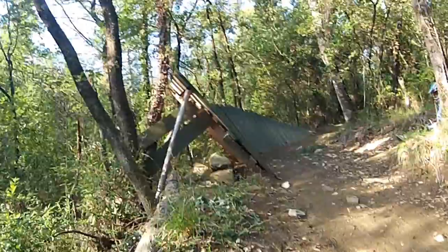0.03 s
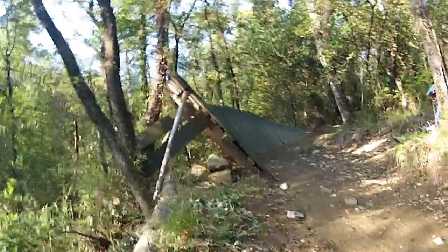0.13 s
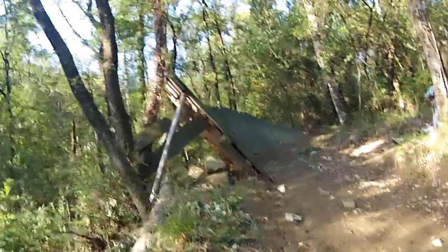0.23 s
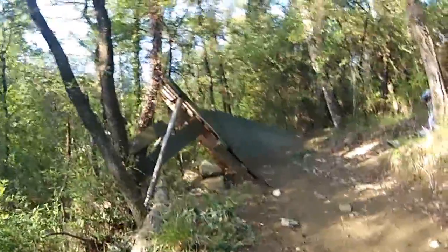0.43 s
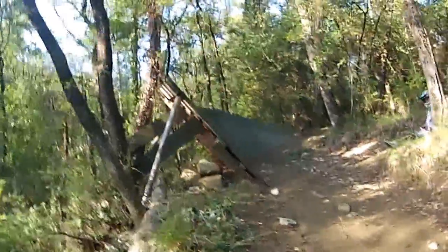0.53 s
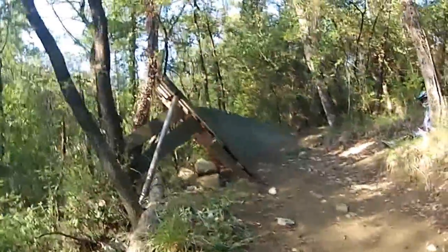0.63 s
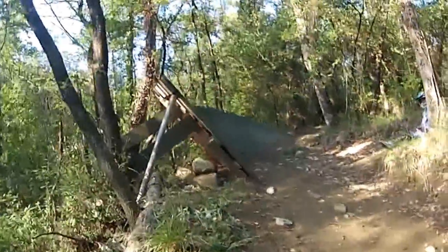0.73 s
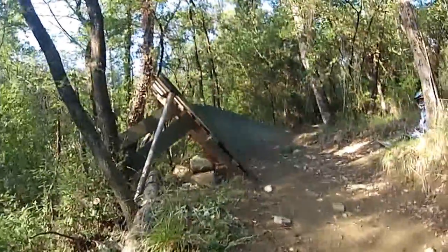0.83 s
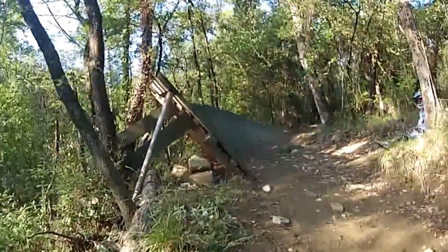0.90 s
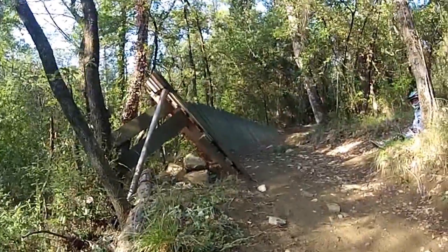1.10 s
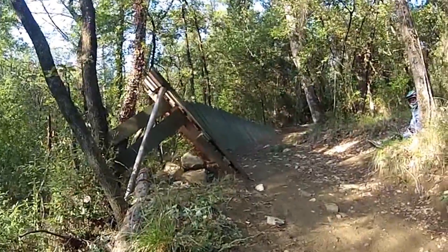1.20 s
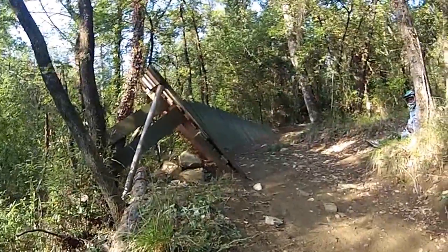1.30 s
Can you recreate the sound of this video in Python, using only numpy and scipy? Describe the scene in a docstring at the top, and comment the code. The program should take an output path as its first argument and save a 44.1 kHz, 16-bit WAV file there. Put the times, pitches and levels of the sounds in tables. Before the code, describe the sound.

A finger rubs across a camera's microphone in three quick strokes, with low bumps, ticks and a brief ringing scrape on the hardest. A few small clicks and soft knocks follow on a quiet woodland trail.

```python
"""Handling noise at a hand-held camera's own microphone, beside a quiet woodland trail.
Faint outdoor air opens abruptly, and at once a finger rubs over the case in three strokes: tiny slips
rasp through the shell while the grip rumbles and bumps and the case ticks a few times.
Half a second in, in the hardest stroke, the skin catches and rings what is likely the microphone port.
After 1.1 s the finger rests; a few dry clicks and soft knocks follow, then only air and a low rumble."""
import sys
import numpy as np
from scipy import signal
from scipy.fft import rfft, irfft
from scipy.io import wavfile
from scipy.ndimage import uniform_filter1d

SR = 44100
rng = np.random.default_rng(int(sys.argv[2]) if len(sys.argv) > 2 else 0)


def dump(signal):
    """Clip the signal to [-1, 1] and save it as 16-bit WAV at the path in sys.argv[1]."""
    limited = np.clip(np.atleast_2d(signal).T, -1, 1)
    pcm = np.round(limited * 32767).astype(np.int16)
    wavfile.write(sys.argv[1], SR, pcm)


N = 59535
T = np.arange(N) / SR


def undb(db):
    """Decibels to gain."""
    return 10 ** (np.asarray(db) / 20)


def unit(x):
    """Scale to rms 1."""
    return x / np.sqrt(np.mean(x ** 2) + 1e-20)


def peak(x, db):
    """Scale to a peak level."""
    return x * undb(db) / (np.abs(x).max() + 1e-12)


def curve(rows):
    """Gain over time through (time [s], level [dB]) points."""
    return undb(np.interp(T, *np.array(rows).T))


def colour(x, points):
    """Minimum-phase filter through (frequency [Hz], gain [dB]) points."""
    hz, db = np.array(points, float).T
    size = 4096
    bins_hz = np.maximum(np.arange(size // 2 + 1) * SR / size, 1)
    gain = undb(np.interp(np.log(bins_hz), np.log(hz), db))
    cepstrum = irfft(np.log(gain))
    cepstrum[1:size // 2] *= 2
    cepstrum[size // 2 + 1:] = 0
    return signal.fftconvolve(x, irfft(np.exp(rfft(cepstrum))))[:N]


def shelf(x, hz, rows):
    """Raise or lower everything above hz along (time [s], gain [dB]) points."""
    highs = signal.sosfiltfilt(signal.butter(2, hz, "high", fs=SR, output="sos"), x)
    return x + (curve(rows) - 1) * highs


def ring(x, hz, width):
    """One resonance, gain 1 at its centre."""
    return signal.lfilter(*signal.iirpeak(hz, hz / width, fs=SR), x)


def resonate(x, modes):
    """A set of resonances, each with its flanks steepened by a second, wider one."""
    return sum(undb(db) * ring(ring(x, hz, width), hz, 5.5 * width) for hz, width, db in modes)


def wander(per_s):
    """Smooth random motion with rms 1."""
    hold = int(SR / per_s)
    steps = np.repeat(rng.standard_normal(N)[:N // hold + 1], hold)
    return unit(uniform_filter1d(steps, hold)[:N])


def steady(x, span_s):
    """Even out slow swells of a random signal, keeping its grain."""
    power = uniform_filter1d(x ** 2, max(int(span_s * SR), 2))
    return x / np.sqrt(np.abs(power) + 1e-12)


def burst(start, decay_s):
    """Noise of a short contact that crumbles away."""
    return rng.standard_normal(N) * (T >= start) * np.exp(-np.maximum(T - start, 0) / decay_s)


def tap(start, again_s, again_db):
    """A sharp impulse and a weaker one just after it."""
    return np.diff((T >= start) + undb(again_db) * (T >= start + again_s), prepend=0)


# Spectrum of the open air beside the trail (frequency [Hz], gain [dB])
AIR_COLOUR = [(30, -10), (200, -6.5), (400, -9), (900, -16.5), (2400, -21), (5200, -29), (6000, -40),
              (6800, -30.5), (12000, -35.5), (15000, -39)]

def air(level_db=-63.5):
    """Faint, steady outdoor background all around the microphone."""
    return undb(level_db) * unit(colour(rng.standard_normal(N), AIR_COLOUR))


def slips(per_s=1500, scatter_db=1.5, hiss_db=0.5):
    """Skin sliding on the case: dense tiny slips of uneven size over a smooth hiss."""
    hits = rng.random(N) < per_s / SR
    sizes = np.sign(rng.standard_normal(N)) * undb(scatter_db * rng.standard_normal(N))
    hiss = undb(hiss_db) * rng.standard_normal(N)
    return steady(unit(hits * sizes) + hiss, span_s=0.014)


# Strokes of the finger on the case (time [s], level [dB])
STROKES = [(0.12, -48.5), (0.165, -44.5), (0.252, -40.5), (0.274, -54), (0.325, -47), (0.389, -46.5),
           (0.400, -38), (0.445, -33.5), (0.475, -33.5), (0.53, -31.5), (0.605, -34.5), (0.628, -40.5),
           (0.695, -43.5), (0.718, -57.5), (0.738, -50.5), (0.762, -43), (0.835, -40), (0.87, -43),
           (0.912, -43), (0.962, -48.5), (1.02, -48), (1.052, -43.5), (1.075, -55.5), (1.108, -49.5),
           (1.122, -76), (1.35, -107)]
# The shell as the microphone inside hears it (frequency [Hz], gain [dB])
SHELL_COLOUR = [(100, 2), (300, -8), (480, -15.5), (720, -14), (980, -2), (1180, -6.5), (1550, -3),
                (1850, 2), (2100, 1.5), (2480, -0.5), (2900, -8.5), (3250, -4.5), (3750, -6.5),
                (4050, -13.5), (5200, -15), (6000, -31), (6800, -17.5), (7900, -19), (8350, -13.5),
                (9200, -15), (9550, -11.5), (10200, -13), (11600, -39), (12700, -42), (13900, -12.5),
                (15400, -23.5)]
# Treble of the rubbing (time [s], gain [dB])
RUB_TREBLE = [(0.15, 5.5), (0.257, 7.5), (0.28, -0.5), (0.305, 7), (0.40, -3), (0.50, 1.5), (0.66, 2),
              (0.83, -0.5), (1.05, -3.5)]
# Top octave of the rubbing (time [s], gain [dB])
RUB_SHEEN = [(0.25, -4.5), (0.28, -1), (0.33, -5.5), (0.385, 2), (0.397, 4.5), (0.445, 4), (0.49, -0.5),
             (0.85, 2)]

def rubbing(flutter_db=1.17, treble_hz=3900, sheen_hz=8000):
    """Slips drive the shell right at the microphone; the brightness shifts along the strokes."""
    rub = unit(colour(slips(), SHELL_COLOUR)) * curve(STROKES)
    rub *= undb(flutter_db * wander(per_s=109.9))
    rub = shelf(rub, treble_hz, RUB_TREBLE)
    return shelf(rub, sheen_hz, RUB_SHEEN)


# Rasps under the finger (centre time [s], length [s], frequency [Hz], width [Hz], level [dB])
FINGER_RASPS = [(0.225, 0.077, 1345, 103.7, -46), (0.198, 0.18, 2475, 175.9, -49),
                (0.4495, 0.13, 1866, 120.4, -37), (0.56, 0.11, 950, 139, -45.5),
                (0.903, 0.046, 1785, 240.7, -45.5), (1.095, 0.019, 2920, 600, -59.5)]

def rasps():
    """Single resonances, driven by slips, swell and fade under the finger."""
    out = np.zeros(N)
    for centre, length, hz, width, db in FINGER_RASPS:
        swell = np.sqrt(np.maximum(1 - (2 * (T - centre) / length) ** 2, 0))
        band = ring(ring(slips(), hz, width), hz, 2 * width)
        out += undb(db) * swell * steady(band, span_s=0.022)
    return out


# Rumble of the grip (time [s], level [dB])
GRIP_LEVEL = [(0.12, -51), (0.15, -48), (0.19, -58), (0.37, -53.5), (0.44, -47.5), (0.53, -35.5),
              (0.60, -35.5), (0.65, -43.5), (0.715, -50.5), (0.80, -44), (0.90, -47), (0.96, -47),
              (1.13, -53.5), (1.35, -57.5)]
# Its spectrum at the microphone (frequency [Hz], gain [dB])
GRIP_COLOUR = [(15, -2.5), (38, 2), (70, -5.5), (130, -11.5), (250, -16.5), (450, -25), (900, -47.5),
               (2500, -65)]

def grip_rumble():
    """The hand shakes the camera body, and the microphone with it."""
    rumble = colour(rng.standard_normal(N), GRIP_COLOUR)
    return steady(rumble, span_s=0.037) * curve(GRIP_LEVEL)


# Bumps of the hand on the body (time [s], frequency [Hz], decay [s], level [dB])
GRIP_BUMPS = [(0.133, 117, 0.012, -44.5), (0.149, 115, 0.007, -32.5), (0.243, 97, 0.011, -38),
              (0.272, 43, 0.039, -33), (0.308, 75, 0.012, -39), (0.404, 106.4, 0.01, -27.5),
              (0.488, 185, 0.0046, -29), (0.518, 134, 0.013, -30), (0.591, 108, 0.0097, -32),
              (0.757, 118.2, 0.029, -34.5), (0.779, 153, 0.019, -38.5), (0.886, 41.4, 0.046, -40.5),
              (0.899, 161, 0.0069, -38), (0.931, 61, 0.01, -42), (1.133, 197, 0.0025, -43),
              (1.262, 70, .007, -45)]
# Dull thud of the case under each bump (frequency [Hz], gain [dB])
THUD_COLOUR = [(80, -10), (200, 0), (450, -9), (800, -20.5), (2500, -38.5)]

def grip_bumps(attack_s=0.00085, thud_db=-6, full_thud_hz=146):
    """Each bump of the grip swings the body and thuds in the case."""
    out = np.zeros(N)
    for at, hz, decay, db in GRIP_BUMPS:
        age = np.maximum(T - at, 0)
        envelope = (1 - np.exp(-age / attack_s)) * np.exp(-age / decay)
        swing = np.sin(2 * np.pi * hz * age) * envelope
        thud = colour(burst(at, decay_s=0.014), THUD_COLOUR)
        hardness = min(hz / full_thud_hz, 1)  # slower bumps are softer contacts and thud less
        out += peak(swing, db) + peak(thud, db + thud_db) * hardness
    return out


# Ticks of the case, close to the microphone (time [s], level [dB], crunch decay [s])
CASE_TICKS = [(0.1354, -33.5, 0.0022), (0.152, -21.3, 0.0022), (0.247, -31, 0.0057), (0.3942, -30, 0.0091),
              (0.489, -25, .004), (1.055, -46, 0.0024), (1.1345, -52, 0.024), (1.247, -54, 0.039)]
# Modes of the tapped shell (frequency [Hz], width [Hz], gain [dB])
CASE_MODES = [(1898, 38, -1), (2483, 108, -1), (3400, 160, -9), (3800, 220, -10.5), (8300, 110, -9),
              (9520, 83, -8), (14700, 390, -12)]

def ticks(crunch_db=-5, pad_hz=10900):
    """Each tick bounces once and rings the shell with a short crunch, dulled by the finger pad."""
    out = np.zeros(N)
    for at, db, decay in CASE_TICKS:
        ringing = resonate(tap(at, again_s=0.0016, again_db=-1.5), CASE_MODES)
        crunch = colour(burst(at, decay), SHELL_COLOUR)
        out += peak(ringing, db) + peak(crunch, db + crunch_db)
    return signal.lfilter(*signal.butter(1, pad_hz, fs=SR), out)


# Skin catching in the hardest stroke (time [s], level [dB])
CATCH_LEVEL = [(0.47, -53), (0.524, -37), (0.531, -31.5), (0.56, -29), (0.573, -31.5), (0.589, -24.5),
               (0.61, -27), (0.632, -37), (0.655, -30), (0.671, -39.5), (0.69, -35.5), (0.712, -57.5)]
# Resonances, likely of the microphone port (frequency [Hz], width [Hz], gain [dB])
PORT_MODES = [(3088, 137, 16), (3280, 90, 20.5), (3616, 130, -0.5), (8140, 150, -4), (8720, 120, 10),
              (8880, 240, 3), (15260, 180, 6.5)]

def catching(per_s=220, jitter=0.25, scatter_db=0.5, grit_db=-3):
    """Uneven stick-slip pulses, gritty with tiny slips, ring the port."""
    start, end = CATCH_LEVEL[0][0], CATCH_LEVEL[-1][0]
    gap_chance, size_chance = rng.standard_normal((600, 2)).T
    times = start + np.cumsum(np.exp(jitter * gap_chance)) / per_s
    pulses = np.bincount((times * SR).astype(int), undb(scatter_db * size_chance), N)[:N]
    drive = pulses * np.sqrt(SR / per_s) + undb(grit_db) * slips()
    ringing = steady(resonate(drive, PORT_MODES), span_s=0.0124)
    return ringing * curve(CATCH_LEVEL) * (T > start) * (T < end)


# Hard snags of the skin at the port (time [s], level [dB])
SKIN_SNAGS = [(0.5269, -22.5), (0.5326, -17.5), (0.5412, -14), (0.5837, -20.5), (0.5960, -26.5),
              (0.6750, -21)]

def snags(crunch_db=-11):
    """Each snag slips twice, ringing the port loudly, and bites into the shell."""
    out = np.zeros(N)
    for at, db in SKIN_SNAGS:
        ringing = resonate(tap(at, again_s=0.0015, again_db=-2), PORT_MODES)
        crunch = colour(burst(at, decay_s=0.0016), SHELL_COLOUR)
        out += peak(ringing, db) + peak(crunch, db + crunch_db)
    return out


# Small close clicks (time [s], peak level [dB])
DRY_CLICKS = [(1.148, -50), (1.1835, -48.5), (1.2490, -52)]
# Their spectrum (frequency [Hz], gain [dB])
DRY_CLICK_COLOUR = [(800, -5), (3800, -2), (7000, -3), (11000, -16), (15000, -13)]

def clicks(decay_s=0.0011):
    """Thin, dry clicks follow once the finger rests."""
    return sum(peak(colour(burst(at, decay_s), DRY_CLICK_COLOUR), db) for at, db in DRY_CLICKS)


def scene():
    """Everything reaches the camera's one microphone, the same left and right."""
    finger = rubbing() + rasps() + catching() + snags()
    body = clicks() + ticks() + grip_rumble() + grip_bumps()
    mono = finger + body + air()
    return np.array([mono, mono])


def record(dry, start_s=0.1189, fade_s=0.00099, top_hz=15420):
    """The camera's input opens abruptly and cuts the top steeply."""
    opened = np.clip((T - start_s) / fade_s, 0, 1)
    lowpass = signal.ellip(10, 0.2, 80, top_hz, fs=SR, output="sos")
    return signal.sosfilt(lowpass, dry * opened)


dry = scene()
out = record(dry)
dump(out)
```